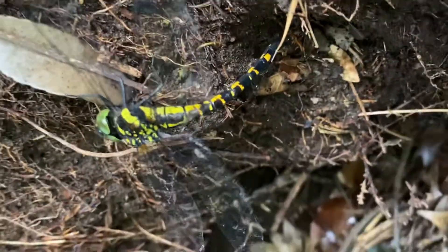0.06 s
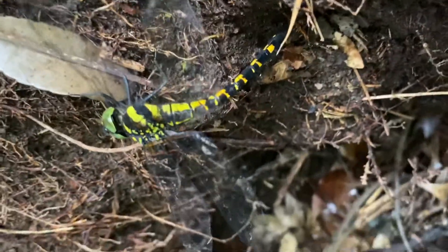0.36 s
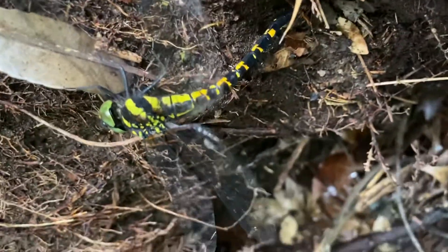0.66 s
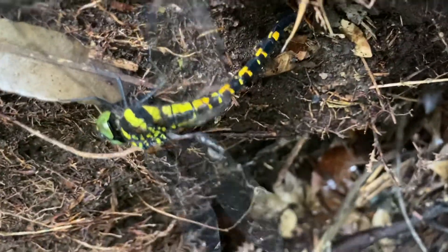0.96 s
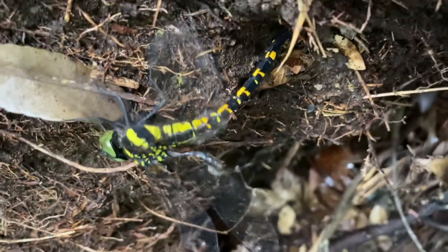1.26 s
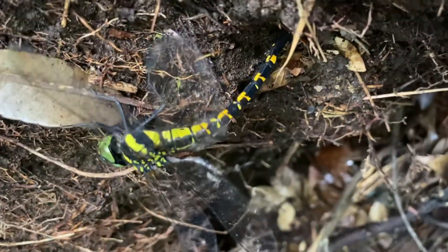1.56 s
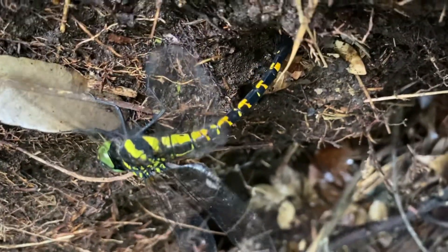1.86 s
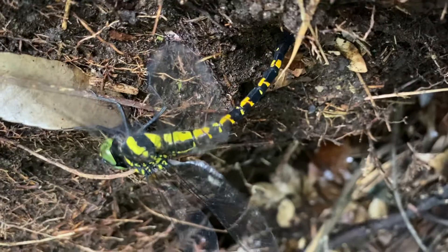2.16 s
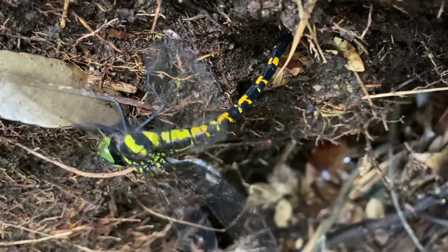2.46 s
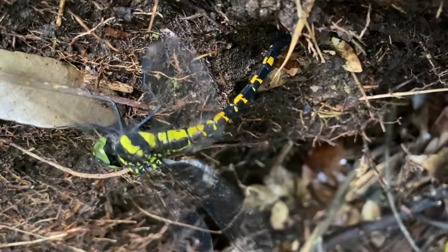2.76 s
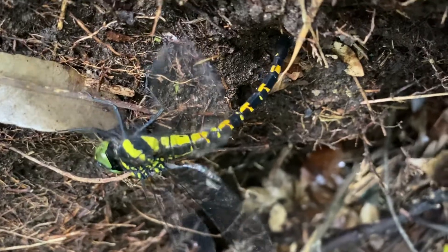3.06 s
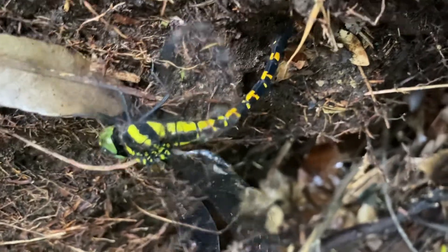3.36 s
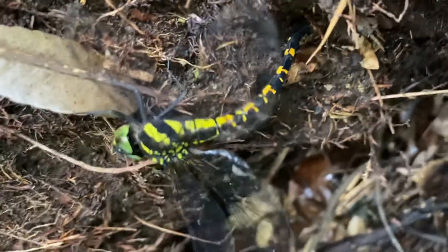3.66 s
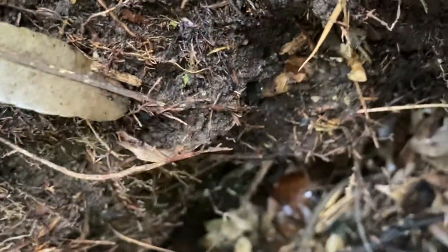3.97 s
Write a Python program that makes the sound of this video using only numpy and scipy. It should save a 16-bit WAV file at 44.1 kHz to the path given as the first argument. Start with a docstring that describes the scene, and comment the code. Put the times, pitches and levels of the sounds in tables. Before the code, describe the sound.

Quiet woodland hiss with faint ticks, then a sudden rustle and thump on the microphone.

```python
"""A quiet wooded bank, heard from a hand-held stereo microphone. Soft hiss and low rumble fill the air,
a far engine hums steadily and a faint call repeats, lingering among the trees. Close by, dry litter
ticks with a woody ring, scuffs and crunches. Near the end the microphone shifts in the hand: small dull
knocks travel through its casing, then something brushes it with a scratchy rustle and a low thump."""
import sys
import numpy as np
from scipy import signal
from scipy.fft import rfft, irfft
from scipy.io import wavfile
from scipy.ndimage import uniform_filter1d

SR = 44100
rng = np.random.default_rng(int(sys.argv[2]) if len(sys.argv) > 2 else 0)


def materialize(psi):
    """Save the field psi as 16-bit PCM at rate SR to the path in sys.argv[1].

    A 1-D psi becomes a single channel; in a 2-D psi each row is a channel.
    """
    bounded = np.clip(np.atleast_2d(psi).T, -1, 1)
    quanta = np.round(bounded * 32767).astype(np.int16)
    wavfile.write(sys.argv[1], SR, quanta)


N = 176400
T = np.arange(N) / SR
BIN_HZ = np.fft.rfftfreq(N, 1 / SR)

def from_db(db):
    """Decibels to gain."""
    return 10 ** (np.asarray(db) / 20)

def unit_rms(x):
    """Scale to rms 1."""
    return x / np.sqrt(np.mean(x ** 2) + 1e-20)

def level(rows):
    """Gain along a (seconds, dB) curve; one that begins at 1 s or later is silent until then."""
    times, db = np.transpose(rows)
    return from_db(np.interp(T, times, db, left=db[0] if times[0] < 1 else -200))

def at_bins(rows):
    """Read a (Hz, value) table at every frequency bin."""
    hz, value = np.transpose(rows)
    return np.interp(np.log(BIN_HZ + 1e-9), np.log(hz), value)

def pan(db):
    """Stereo gains for a left-minus-right level."""
    return from_db(db * np.array([[.5], [-.5]]))

def leaning(x, balance):
    """Pan each frequency by its own amount."""
    return irfft(rfft(x) * pan(at_bins(balance)), N)

def left_later(x, lag_s):
    """The sound reaches the right side first."""
    delay = np.exp(-2j * np.pi * BIN_HZ * lag_s)
    return np.array([irfft(rfft(x[0]) * delay, N), x[1]])

def drift(rate_hz):
    """Random wander of rms 1, mostly slower than the rate."""
    return unit_rms(irfft(rfft(rng.standard_normal(N)) / (1 + (BIN_HZ / rate_hz) ** 2), N))

def burst(start, t60, attack, hold=0):
    """Envelope that rises, holds and dies away; times in seconds."""
    envelope = np.zeros(N)
    span = (T >= start) & (T < start + attack + hold + 2 * t60)
    age = T[span] - start
    envelope[span] = np.minimum(age / attack, 1) * from_db(-60 * np.maximum(age - attack - hold, 0) / t60)
    return envelope

def humps(rows):
    """Rounded rises and falls of level."""
    return sum(from_db(db) / (1 + ((T - middle) / half) ** 4) for middle, db, half in rows)

# The bank's stereo width at the microphone. Each row: frequency in Hz, left-right correlation.
BANK_LIKENESS = [(60, 0.97), (130, 0.99), (290, 0.62), (640, 0.12), (1410, 0.015), (3100, 0.26),
                 (6820, 0.071), (15000, 0.35)]
def coloured(spectrum, source=None, likeness=BANK_LIKENESS):
    """Two unrelated signals (white noise by default) become coloured stereo of rms 1."""
    if source is None:
        source = rng.standard_normal((2, N))
    mid, side = rfft(source) * from_db(at_bins(spectrum))
    alike = at_bins(likeness)
    return unit_rms(irfft(np.sqrt(1 + alike) * mid + np.sqrt(1 - alike) * side * [[1], [-1]], N))

# Colours of the air all around. Each row: frequency in Hz, relative level in dB.
RUMBLE_COLOUR = [(25, -50), (45, -0.5), (80, 4.5), (115, -2), (160, -7.5), (220, -17.5), (300, -45.5),
                 (600, -65.5)]
HISS_COLOUR = [(150, 14.5), (400, 6.5), (800, -2), (1500, -3), (2700, -6.5), (5000, -4.5), (7000, -6.5),
               (8500, -14), (10500, -13.5), (12000, -41), (14500, -18), (16000, -63)]
SWELL_COLOUR = [(150, 6.5), (350, 1.5), (800, -19), (1400, -6.5), (2100, -8), (3000, -35), (8000, -42)]
SIZZLE_COLOUR = [(7500, -65), (9200, 4.5), (9900, 6), (10900, -7), (12000, -38), (14600, -2), (16000, -34)]
# How the air rises and falls. Each row: time in seconds, level in dB.
RUMBLE_LEVEL = [(0, -52), (1.0, -50.5), (1.5, -55), (1.8, -51), (2.25, -54), (2.47, -48), (2.6, -50),
                (3.05, -55.5), (3.5, -47), (4, -56)]
HISS_LEVEL = [(0, -60.5), (1.3, -62), (2.2, -62.5), (2.9, -65), (3.4, -59.5), (4, -60)]
SIZZLE_LEVEL = [(0, -91), (1.5, -90.5), (2.1, -75), (2.45, -80.5), (2.7, -75), (3.4, -71.5), (3.7, -72.5),
                (4, -86)]
# Where the hiss sits. Each row: frequency in Hz, left minus right in dB.
HISS_BALANCE = [(700, .5), (1300, -3.5), (2400, -1.5), (4400, 2.5), (8000, 0.5)]
def air():
    """All around: low rumble, broad hiss with a wavering middle, and a thin sizzle that comes up late."""
    rumble = level(RUMBLE_LEVEL) * coloured(RUMBLE_COLOUR)
    hiss = level(HISS_LEVEL) * leaning(coloured(HISS_COLOUR), HISS_BALANCE)
    swell = from_db(-73 + 4 * drift(rate_hz=18)) * coloured(SWELL_COLOUR)
    sizzle = level(SIZZLE_LEVEL) * coloured(SIZZLE_COLOUR) * from_db(drift(rate_hz=30))
    return rumble + hiss + swell + sizzle

# The engine, far off. Each row: harmonic number, rms level in dB.
ENGINE_ORDERS = [(1, -52), (2, -65), (3, -67)]
def far_engine(hum_hz=42.73, wander=.005):
    """The lowest orders of a distant engine, barely wandering in pitch."""
    phase = 2 * np.pi * np.cumsum(hum_hz * (1 + wander * drift(rate_hz=7.4))) / SR
    return sum(np.sqrt(2) * from_db(db) * np.sin(order * phase + rng.uniform(0, 2 * np.pi))
               for order, db in ENGINE_ORDERS)

# The call, far among the trees.
# Each row: start in seconds, hold in seconds, level in dB, first pitch in Hz, last pitch in Hz.
CALL_NOTES = [(0, 0.074, -70, 1680, 1580), (0.047, 0.065, -71, 1260, 1088), (.553, 0.02, -65.5, 1592, 1605),
              (0.609, 0.036, -65, 1600, 1600), (1.139, 0.052, -68.5, 1593, 1643),
              (1.207, 0.088, -72.5, 1602, 1420), (1.674, 0.12, -73, 1270, 1180),
              (1.82, 0.087, -66.5, 1611, 1493), (1.91, 0.037, -73, 1599, 1577),
              (2.415, 0.038, -69, 1637, 1617), (2.489, 0.042, -70.5, 1564, 1510),
              (2.556, 0.044, -74, 1590, 1638), (3.088, 0.094, -72, 1220, 1220),
              (3.147, 0.095, -75.5, 1446, 1476)]
def far_calls(hoarse_below_hz=282.4, hoarse_width_hz=270, waver_rad=0.63, flutter_db=1.5, tail_db=-4.5):
    """Short gliding notes with a hoarse edge below their pitch, lingering among the trees."""
    notes = 0
    for start, hold, db, first_hz, last_hz in CALL_NOTES:
        pitch = np.interp(T, [start, start + hold], [first_hz, last_hz])
        phase = 2 * np.pi * np.cumsum(pitch) / SR
        notes += from_db(db) * burst(start, t60=0.11, attack=0.0055, hold=hold) * np.exp(1j * phase)
    shift_down = from_db(-5.5) * np.exp(-2j * np.pi * hoarse_below_hz * T)
    channels = []
    for _ in range(2):
        hoarse = shift_down * (drift(hoarse_width_hz) + 1j * drift(hoarse_width_hz))
        waver = np.exp(1j * waver_rad * drift(rate_hz=51))
        direct = (notes * (waver + hoarse)).real * from_db(flutter_db * drift(rate_hz=39))
        trees = rng.standard_normal(N) * burst(0, t60=1, attack=0.015)
        tail = signal.fftconvolve(direct, trees / np.linalg.norm(trees))[:N]
        channels.append(direct + from_db(tail_db) * tail)
    return np.array(channels)

# Dry litter close to the microphone.
# Each row: start in seconds, level in dB, left minus right in dB, ring relative to the crack in dB.
LITTER_TICKS = [(0.1103, -53, 1.5, -2), (0.1374, -55.5, 4, -6), (.184, -65, -1, 6.5),
                (0.2055, -55, 0, -2.5), (0.223, -63, -4, 1), (0.6525, -50.5, -0.5, -10),
                (1.1167, -57.5, -1, -4.5), (1.157, -58, 4, -2), (2.2701, -51.5, -1, -25),
                (3.132, -56.5, 2, -20)]
# A twig's crack and its ring. Each row: frequency in Hz, relative level in dB.
CRACK_COLOUR = [(200, 8), (900, 0), (1500, -1.5), (3200, 7.5), (5500, 3.5), (8000, 0), (10000, -11),
                (12000, -38), (16000, -27)]
WOOD_COLOUR = [(300, -2.5), (600, -14), (880, 2.5), (1350, -15), (1950, -6.5), (2600, -35), (8000, -45)]
# Their stereo width. Each row: frequency in Hz, left-right correlation.
TICK_LIKENESS = [(500, 0.49), (8000, 0.24)]
def litter_ticks(attack_s=0.00091, settle_db=-10):
    """Close by, tiny cracks with a settling tail set twigs ringing."""
    cracks, rings = 0, 0
    for start, db, pan_db, ring_db in LITTER_TICKS:
        gain = from_db(db) * pan(pan_db)
        settling = from_db(settle_db) * burst(start, t60=0.12, attack=attack_s)
        cracks += gain * (burst(start, t60=0.007, attack=attack_s) + settling)
        rings += gain * from_db(ring_db) * burst(start, t60=0.064, attack=attack_s)
    return (cracks * coloured(CRACK_COLOUR, likeness=TICK_LIKENESS)
            + rings * coloured(WOOD_COLOUR, likeness=TICK_LIKENESS))

# Stirrings on the ground nearby. Each row: middle in seconds, level in dB, half length in seconds.
LITTER_SCUFFS = [(.561, -64.5, 0.0034), (1.533, -69, 0.0037), (1.74, -69.5, 0.013), (3.12, -60.5, 0.0099),
                 (3.236, -60.5, 0.0033), (3.394, -55.5, 0.0052), (3.476, -60.5, 0.0085),
                 (3.723, -60.5, 0.0062)]
SOIL_CRUNCHES = [(.628, -63, 0.015), (3.13, -72, 0.031)]
# Their colours. Each row: frequency in Hz, relative level in dB.
SCUFF_COLOUR = [(1000, 2.5), (4000, -4.5), (7000, 2.5), (8400, 0), (10000, 8.5), (12200, -15.5), (14800, 7),
                (16000, -22)]
CRUNCH_COLOUR = [(500, -21), (1500, -1), (2200, 10.5), (3000, -14.5), (6500, -0.5), (9000, -16),
                 (12000, -33)]
def ground_scuffs(flicker_db=1.7):
    """Soft high scuffs of litter and duller crunches of soil, roughened by a fast flicker."""
    scuffs = humps(LITTER_SCUFFS) * coloured(SCUFF_COLOUR)
    crunches = humps(SOIL_CRUNCHES) * coloured(CRUNCH_COLOUR)
    return (scuffs + crunches) * from_db(flicker_db * drift(rate_hz=200))

def far_pip(pitch_hz=975, waver_rad=0.62):
    """One short, lower pip among the distant calls."""
    tone = np.sin(2 * np.pi * pitch_hz * T + waver_rad * drift(rate_hz=70))
    return from_db(-60) * burst(start=2.476, t60=0.05, attack=0.0072) * tone

# The hand on the microphone. Each row: start in seconds, gain in dB, extra treble gain in dB.
HAND_KNOCKS = [(3.3821, -7, -5), (3.486, -9, 4), (3.5397, -9.5, -6), (3.612, -7, 9), (3.6495, -6, -2),
               (3.7503, -6.5, 3), (3.892, -3, -7)]
# What the casing passes on. Each row: frequency in Hz, gain in dB.
CASING_RESPONSE = [(60, 4), (130, 6.5), (260, 3.5), (480, -10), (800, -5.5), (1250, -9.5), (1530, -28),
                   (1800, -3.5), (2200, -10.5), (2520, -12), (2820, -35), (3300, -30), (5500, -35.5),
                   (12000, -50)]
def handling_knocks(delay_at_1khz_s=.0012, delay_floor_hz=74.6, treble_hz=3000, scatter_db=3):
    """Soft contacts, no two alike, disperse through the casing: highs arrive first, lows trail."""
    hz = BIN_HZ + 1
    # The travel time grows toward the bass and levels off below the floor.
    bending_phase = 2 * np.pi * delay_at_1khz_s * 1000 * np.log(hz + delay_floor_hz)
    spectrum = 0
    for start, db, treble_db in HAND_KNOCKS:
        colour = [(f, gain_db + scatter_db * rng.standard_normal() + treble_db * (f > treble_hz))
                  for f, gain_db in CASING_RESPONSE]
        phase = bending_phase + 2 * np.pi * hz * start
        spectrum += from_db(db + at_bins(colour)) * np.exp(-1j * phase)
    return left_later(pan(db=-1.3) * irfft(spectrum, N), lag_s=.00005)

# The thump, right on the microphone. Each row: frequency in Hz, relative level in dB.
THUMP_COLOUR = [(25, -23), (52, 7), (70, -1), (85, 10), (150, -6.5), (210, -2.5), (280, -17.5),
                (400, -43.5)]
# Its rise and fall. Each row: time in seconds, level in dB.
THUMP_LEVEL = [(3.77, -50), (3.8, -38.5), (3.827, -29.5), (3.86, -33), (3.9, -40.5), (4, -42)]
# Its narrow image. Each row: frequency in Hz, left-right correlation.
THUMP_LIKENESS = [(60, 0.88), (300, 0.96)]
def thump(steady_s=0.023):
    """Something pushes on the microphone: low noise, evened out into one steady shove."""
    push = coloured(THUMP_COLOUR, likeness=THUMP_LIKENESS)
    power = uniform_filter1d(np.mean(push ** 2, axis=0), int(steady_s * SR))
    return level(THUMP_LEVEL) * push / np.sqrt(power)

# Snaps on the microphone. Each row: start in seconds, body level in dB, bright edge level in dB.
RUSTLE_SNAPS = [(3.7882, -43.5, -28), (3.7912, -37.5, -34), (3.7943, -36, -29.5), (3.8092, -34.5, -33),
                (3.8195, -39, -45), (3.8219, -41.5, -33), (3.8501, -34.5, -31.5), (3.871, -47, -58),
                (3.8835, -48, -62), (3.914, -46, -56), (3.9266, -44, -51)]
# Colours of the snaps and the scrape under them. Each row: frequency in Hz, relative level in dB.
SNAP_BODY_COLOUR = [(300, 7), (1400, -8.5), (2100, 2), (2900, -2), (4300, -1), (7500, -2), (8500, -11.5)]
SNAP_EDGE_COLOUR = [(8000, -20), (10000, 2.5), (12200, -15), (14600, 1), (16000, -2.5)]
SCRAPE_COLOUR = [(200, 19), (500, 14), (1300, 4), (2100, 7), (3000, 2.5), (7400, -3), (8400, -24),
                 (9300, 9), (10600, 6.5), (12200, -25), (14200, 8), (16000, -25)]
# The bright edge's stereo width. Each row: frequency in Hz, left-right correlation.
EDGE_LIKENESS = [(9000, 0.65)]
# The course of the scrape. Each row: time in seconds, level in dB.
SCRAPE_LEVEL = [(3.778, -93), (3.79, -51), (3.81, -45), (3.826, -45), (3.84, -47.5), (3.875, -55),
                (3.926, -50), (3.95, -56.5), (4, -50.5)]
# The rustle is nearer the left side. Each row: frequency in Hz, left minus right in dB.
RUSTLE_BALANCE = [(500, 4), (1200, 3.5), (2500, 1), (5000, 3.5), (9000, 0.5), (15000, .5)]
def rustle(grains_per_s=1500, grain_spread_db=1, smooth_db=-3, flicker_db=2):
    """Something brushes the microphone: it catches in separate snaps and scrapes on in grains."""
    sizes = from_db(grain_spread_db * np.minimum(rng.exponential(1, N), 4))
    hits = rng.random(N) < grains_per_s / SR
    grains = unit_rms(sizes * hits * rng.standard_normal((2, N)))
    smooth = from_db(smooth_db) * rng.standard_normal((2, N))
    friction = (grains + smooth) * from_db(flicker_db * drift(rate_hz=160))
    scrape = level(SCRAPE_LEVEL) * coloured(SCRAPE_COLOUR, friction)
    body = coloured(SNAP_BODY_COLOUR)
    edge = left_later(coloured(SNAP_EDGE_COLOUR, likeness=EDGE_LIKENESS), lag_s=0.000291)
    snaps = sum(burst(start, t60=0.013, attack=0.00072) * (from_db(db) * body + from_db(edge_db) * edge)
                for start, db, edge_db in RUSTLE_SNAPS)
    return leaning(scrape + snaps, RUSTLE_BALANCE)

def scene():
    """The bank, far and near, then the handling of the microphone."""
    bank = air() + far_engine() + far_calls() + litter_ticks() + ground_scuffs() + far_pip()
    return bank + handling_knocks() + thump() + rustle()

# The microphone's bass roll-off. Each row: frequency in Hz, gain in dB.
MIC_LOW_CUT = [(22, -11), (34, -0.5)]
def record(dry):
    """The microphone thins the deepest bass, and the top is cut steeply."""
    thinned = irfft(rfft(dry) * from_db(at_bins(MIC_LOW_CUT)), N)
    top_cut = signal.ellip(10, .2, 80, 15900, fs=SR, output="sos")  # low-pass at 15.9 kHz
    return signal.sosfilt(top_cut, thinned)

dry = scene()
out = record(dry)
materialize(out)
```